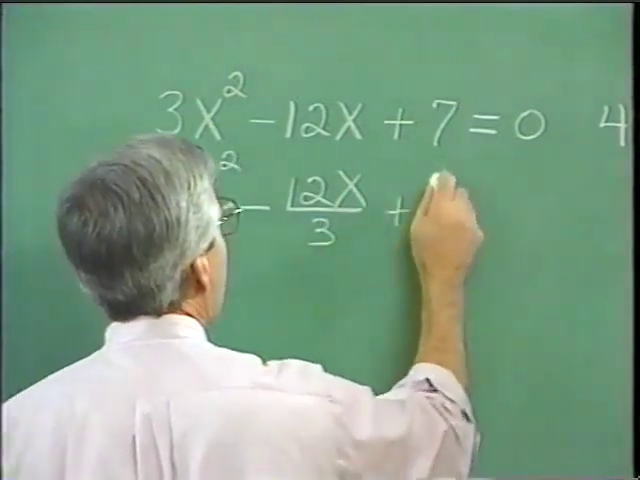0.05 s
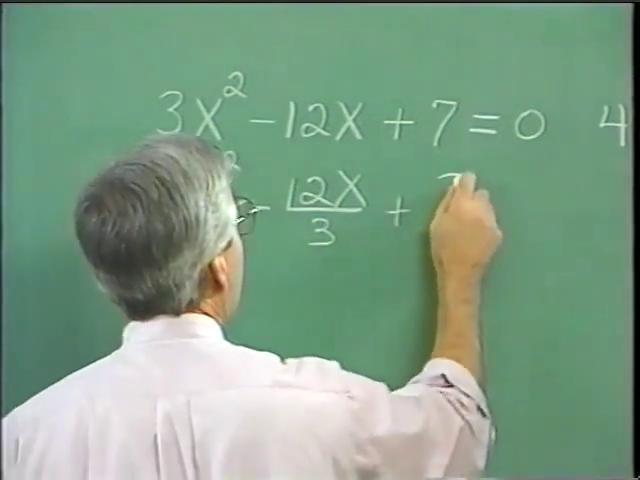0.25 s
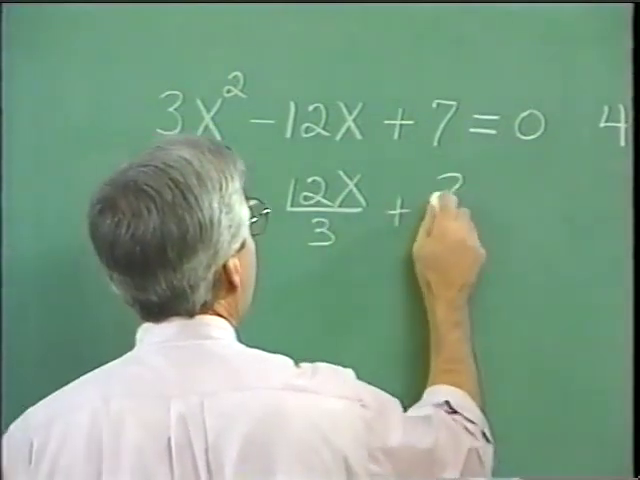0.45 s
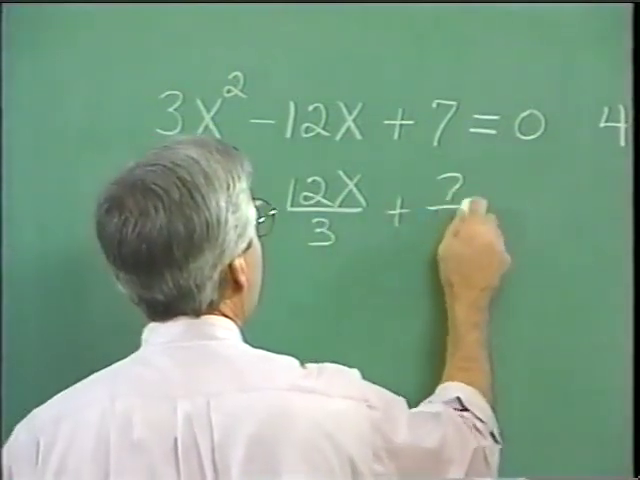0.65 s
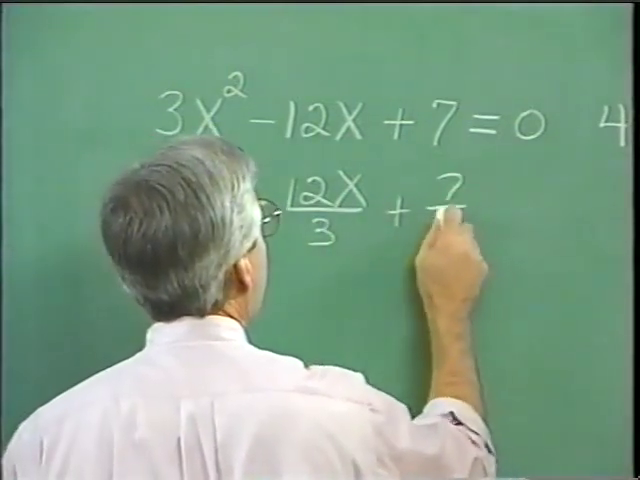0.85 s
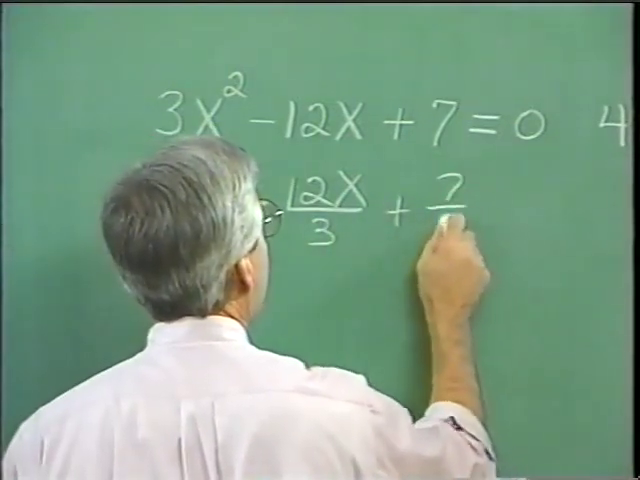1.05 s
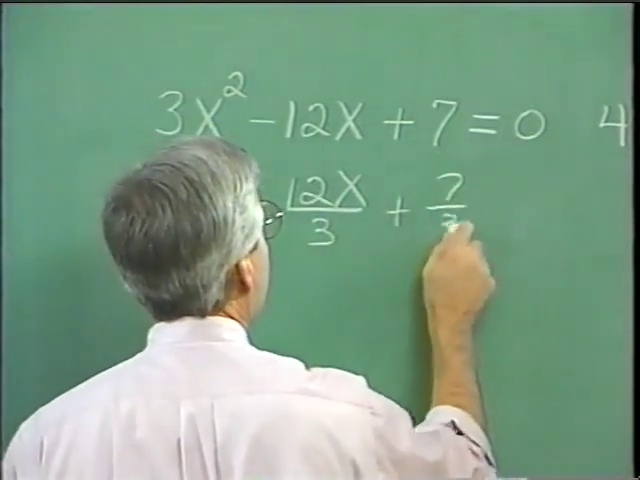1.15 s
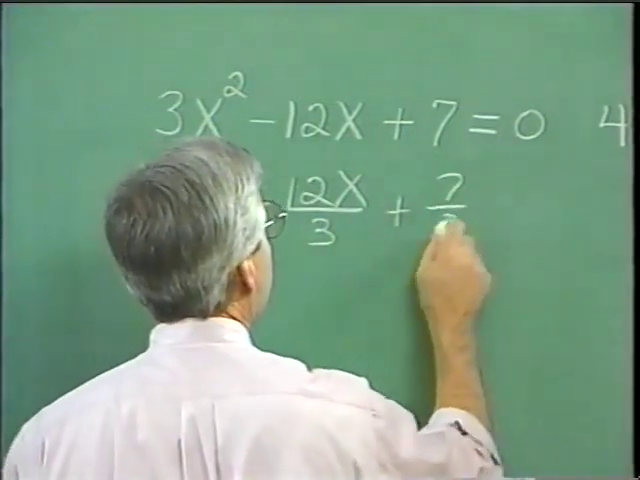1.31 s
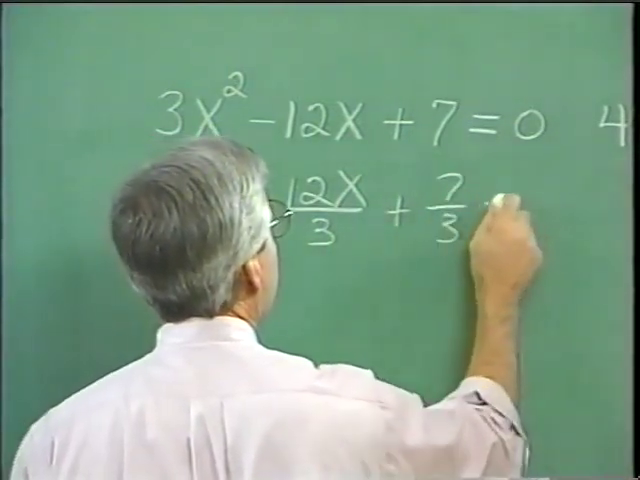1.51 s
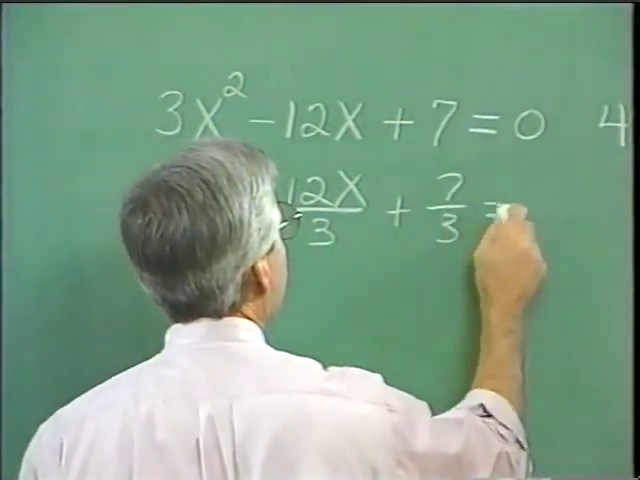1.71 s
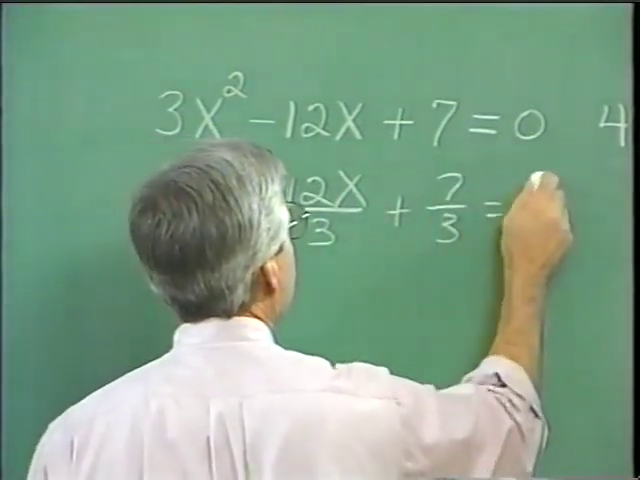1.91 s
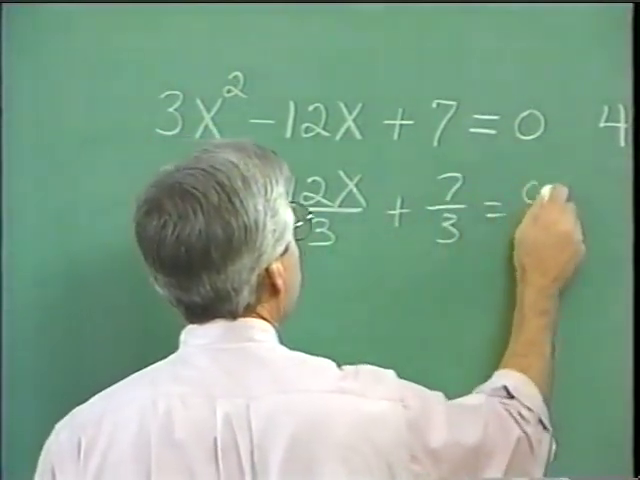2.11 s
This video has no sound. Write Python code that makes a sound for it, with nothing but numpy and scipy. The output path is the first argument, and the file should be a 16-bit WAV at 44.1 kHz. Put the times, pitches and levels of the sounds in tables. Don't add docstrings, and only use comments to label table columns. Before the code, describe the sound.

Chalk writing on a board: six separate hard taps with hollow panel knocks and a low wall thump, very faint dusty strokes between them, close and nearly mono in a quiet, damped classroom with low air rumble.

```python
import sys
import numpy as np
from scipy import signal
from scipy.io import wavfile

SR = 44100
rng = np.random.default_rng(int(sys.argv[2]) if len(sys.argv) > 2 else 0)


def elevation(decibels):
    levels = np.asarray(decibels, float)
    return 10 ** (levels / 20)


def file_out(sig):
    cols = np.atleast_2d(sig).T
    lim = np.clip(cols, -1, 1)
    pcm = np.round(lim * 32767).astype(np.int16)
    wavfile.write(sys.argv[1], SR, pcm)


N = 95432

# (time [s], peak level [dB], crack level [dB], knock brightness [dB per octave],
# place along the board [cm])
TAPS = [
    (0.1047, -30, -49.5, -1.45, -1.5),
    (0.5123, -25, -45.5, 1.17, -1.5),
    (0.8032, -26.5, -47, 2, -0.5),
    (1.4559, -26, -46.5, -0.04, 1),
    (1.6467, -28, -48, 0.55, 3),
    (1.9036, -31.5, -50, -1.3, 5),
]


def rms_one(x):
    return x / np.sqrt(np.mean(x ** 2) + 1e-20)


def at_hz(points, hz):
    table_hz, value = np.array(points).T
    return np.interp(np.log(hz), np.log(table_hz), value)


def drift(rate):
    r = np.exp(-80 * np.pi * rate / SR)
    white = rng.standard_normal(N // 40 + 2002)
    slow = signal.lfilter([1], [1, -2 * r, r * r], white)[2000:]
    return np.interp(np.arange(N) / 40, np.arange(len(slow)), rms_one(slow))


def ring(hits, hz, t60):
    r = 1000 ** (-1 / (t60 * SR))
    w = 2 * np.pi * hz / SR
    return signal.lfilter([0, np.sin(w)], [1, -2 * r * np.cos(w), r * r], hits + 1e-18)


def clicks(s, gain):
    out = np.zeros(N)
    np.add.at(out, np.minimum((np.asarray(s) * SR).astype(int), N - 1), gain)
    return out


def bands(white, spectrum, shape):
    edges = 22 * 2 ** np.arange(0, 9.6, .5)
    out, power = 0, 0
    for k, (low, high) in enumerate(zip(edges, edges[1:])):
        hz = np.sqrt(low * high)
        gain = elevation(at_hz(spectrum, hz))
        power += gain ** 2 * (high - low) * 2 / SR
        band = signal.butter(2, [low, high], "band", fs=SR, output="sos")
        out = out + gain * shape(hz) * signal.sosfilt(band, white[k % 2])
    return out / np.sqrt(power)


def knock():
    # (time [s], level [dB])
    touches = [(.358, -72), (.675, -68), (1.225, -76), (2.0, -72)]
    # (pitch [Hz], level [dB], fade by 60 dB [s], direction of swing [+1 or -1])
    panel = [(115.3, -2.5, 0.053, -1), (147.2, -13, 0.29, 1), (161.6, -14.5, 0.33, 1), (199, -15, 0.24, 1),
             (238.6, -21, 0.32, -1), (244.84, -7, 0.27, 1), (273.3, -14.5, 0.11, 1),
             (278.15, -11.5, 0.25, -1), (304, -14.5, 0.25, -1), (343.1, -18.5, 0.27, 1),
             (388, -17.5, 0.13, 1), (425.6, -17.5, 0.21, -1), (462, -5.5, 0.077, -1),
             (507.1, -20.5, 0.22, 1)]
    # (pitch [Hz], level [dB], fade by 60 dB [s], direction [+1 or -1])
    more_panel = [(536.7, -19, 0.21, 1), (602, -11, 0.096, -1), (641.6, -16, 0.089, 1), (657, -14, 0.092, -1),
                  (705.7, -20.5, 0.12, 1), (765, -26.5, 0.26, 1), (736, -29, 0.32, 1),
                  (844.4, -12.5, 0.078, -1), (886.5, -16.5, 0.091, -1), (947.4, -11, 0.022, 1),
                  (1013, -4.5, 0.011, -1), (1391, -15.5, 0.025, -1), (1603, -23, 0.035, 1),
                  (1970, -27.5, 0.034, 1)]
    lean = [0.072, -0.67, -0.28, -0.12, -.7, -0.84, .1, 0.46, .1, -.2, -0.2, -0.59, 0.28, -0.5, -0.2, -0.25,
            -0.16, -0.49, 0.37, -0.11, -0.28, -0.22, .3, 0.54, 0.24, 0.14, -.2, 0.082]
    knock_db, spread_db, mic_low_hz = -0.3, 0.6, 36.5
    contacts = [(s, db, tilt, cm) for s, db, _, tilt, cm in TAPS]
    contacts += [(s, db, 3.0, 0) for s, db in touches]
    s, db, tilt, cm = np.transpose(contacts)
    out = np.zeros(N)
    for k, (hz, mode_db, t60, sense) in enumerate([*panel, *more_panel]):
        brightness = tilt * np.log2(hz / 300)
        chance = spread_db * rng.standard_normal(len(s))
        level = db + knock_db + mode_db + brightness + lean[k] * cm + chance
        out += sense * ring(clicks(s, elevation(level)), hz, t60)
    return signal.sosfilt(signal.butter(2, mic_low_hz, "high", fs=SR, output="sos"), out)


def crack():
    # (delay [s], level [dB])
    echoes = [
        (0, 2.5),
        (.0019, -2.5),
        (.0042, -8),
        (.009, -9),
        (.0135, -22.5),
        (.025, -15.5),
    ]
    # (pitch [Hz], level [dB per Hz])
    colour = [(1500, -12.5), (2400, -8), (4000, -13.5), (7100, -14), (9000, -20.5), (11700, -27.5),
              (13800, -30.5), (16000, -33)]
    t60, crack_db = 0.0059, 2.5
    s, tip_db = np.array(TAPS)[:, 0], np.array(TAPS)[:, 2]
    hits = np.zeros(N)
    for lag, db in echoes:
        jitter = 0.4 * rng.standard_normal(len(TAPS))
        hits += clicks(s + lag, elevation(tip_db + db + crack_db + jitter))
    burst = signal.lfilter([1], [1, -elevation(-60 / (t60 * SR))], hits)
    return bands(rng.standard_normal((2, N)) * burst, colour, lambda hz: hz > 1500)


def boom():
    boom_hz, boom_db, swell_s, t60 = 54.7, -20, 0.03, 0.52
    t = np.arange(SR // 2) / SR
    swell = 1 - np.exp(-(t / swell_s) ** 2)
    sway = swell * elevation(-60 * t / t60) * np.sin(2 * np.pi * boom_hz * t)
    s, db = np.array(TAPS)[:, 0], np.array(TAPS)[:, 1]
    return signal.fftconvolve(clicks(s, elevation(db + boom_db)), sway / sway.max())[:N]


def tail():
    # (pitch [Hz], level [dB per Hz])
    colour = [(60, -62.5), (150, -11.5), (300, -11), (800, -11.5), (1200, -16.5), (1800, -23),
              (4000, -38.5), (16000, -54.5)]
    # (pitch [Hz], fade by 60 dB [s])
    fade = [(50, 1), (130, 0.82), (350, 0.32), (920, 0.24), (2430, 0.16), (6400, 0.37)]
    tail_db, side_db, rise_cycles = -21, -49, 6
    same_share = 0.6
    starts = (np.array(TAPS)[:, 0] * SR).astype(int)
    hits = clicks(starts / SR + 1e-6, elevation(np.array(TAPS)[:, 1] + tail_db))
    latest = np.maximum(np.searchsorted(starts, np.arange(N), "right") - 1, 0)
    since = np.arange(N) - starts[latest]
    repeated = rng.standard_normal((2, 2, N))[..., since]
    fresh = rng.standard_normal((2, 2, N))
    white = np.sqrt(same_share) * repeated + np.sqrt(1 - same_share) * fresh

    def shape(hz):
        rise = np.exp(-min(hz, 1500) / (rise_cycles * SR))
        fall = signal.lfilter([1], [1, -elevation(-60 / (at_hz(fade, hz) * SR))], hits)
        return signal.lfilter([1 - rise], [1, -rise], fall) * [[1], [elevation(side_db)]]
    return bands(white, colour, shape)


def slide():
    # (start [s], length [s], level [dB])
    strokes = [(0.225, 0.11, -86), (0.56, 0.078, -89), (0.908, 0.11, -89.5), (0.994, 0.11, -85),
               (1.1, 0.1, -88), (1.188, 0.079, -87), (1.924, 0.2, -83.5)]
    # (pitch [Hz], level [dB per Hz])
    colour = [(600, 8), (2000, -28), (5000, -14), (8000, 9), (11000, -11), (15000, -11)]
    grains_per_s = 4000
    t = np.arange(N) / SR
    pressure = np.zeros(N)
    for s, length, db in strokes:
        pressure += elevation(db) * np.sin(np.pi * np.clip((t - s) / length, 0, 1))
    grains = (rng.random((2, N)) < grains_per_s / SR) * rng.standard_normal((2, N))
    return pressure * bands(rms_one(grains), colour, lambda hz: elevation(2.5 * drift(22)))


def air():
    # (pitch [Hz], level [dB per Hz])
    colour = [(12, -52), (20, -16.5), (65, 3), (86, -7.5), (301, -21.5), (422, -31), (459, -28),
              (1480, -41), (16000, -49)]
    # (pitch [Hz], middle level [dB rms], side level [dB rms])
    whine = [(59.4, -71, -94.5), (1700, -112, -95.5), (3320, -94, -101), (4985, -94.5, -108),
             (15735, -88, -102), (15748, -94.5, -112)]
    # (pitch [Hz], side minus middle [dB])
    apart = [(60, -23), (110, -35.5), (200, -33.5), (380, -18), (700, -15), (1290, -7.5), (2380, -10),
             (4400, -12.5), (8120, -13), (15000, -7.5)]
    air_db = -63.5
    t = np.arange(N) / SR

    def shape(hz):
        lumps = 0.83 * min(1, 150 / hz) * drift(9.7)
        return elevation(lumps) * [[1], [elevation(at_hz(apart, hz) + 1.0)]]
    out = elevation(air_db) * bands(rng.standard_normal((2, 2, N)), colour, shape)
    for hz, mid_db, side_db in whine:
        level = elevation(np.array([[mid_db], [side_db]]) + 1.4 * drift(9.5))
        out = out + np.sqrt(2) * level * np.sin(2 * np.pi * hz * t)
    return out


def scene():
    body_side_hz, body_side_db = 895, -29
    crack_side_db, boom_side_db, left_db = -26, -22.5, -0.22
    mid, side = tail() + air()
    body, tip, low_tone = knock(), crack(), boom()
    mid = mid + body + tip + low_tone + slide()
    bright = signal.lfilter(*signal.butter(1, body_side_hz, "high", fs=SR), body)
    side = side - elevation(body_side_db) * bright
    side = side + elevation(crack_side_db) * np.roll(tip, 9)
    side = side + elevation(boom_side_db) * np.roll(low_tone, 200)
    return np.array([(mid + side) * elevation(left_db), (mid - side) * elevation(-left_db)])


def low_pass(x):
    return signal.sosfilt(signal.butter(12, 16450, fs=SR, output="sos"), x)


def record(dry):
    mix = signal.sosfilt(signal.cheby2(10, 50, 16700, fs=SR, output="sos"), dry)
    return low_pass(mix)


dry = scene()
out = record(dry)
file_out(out)
```